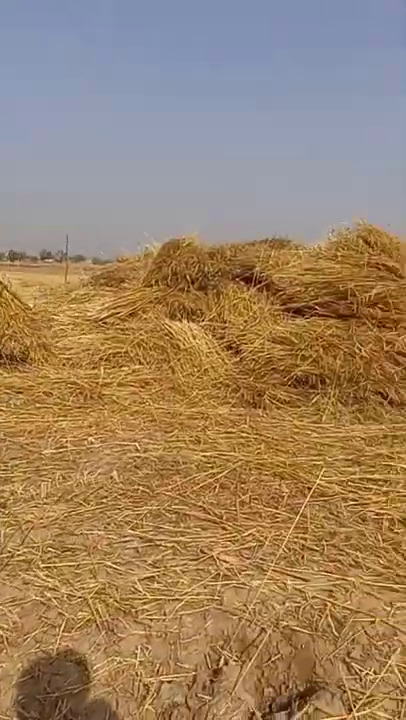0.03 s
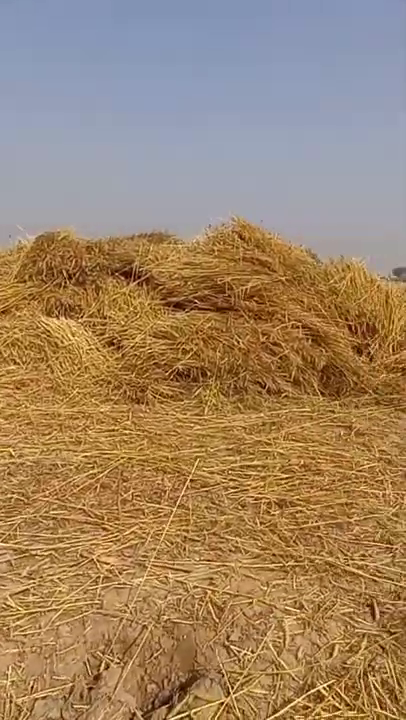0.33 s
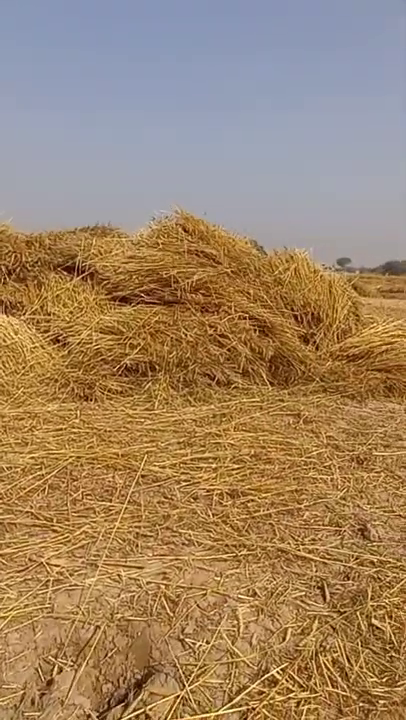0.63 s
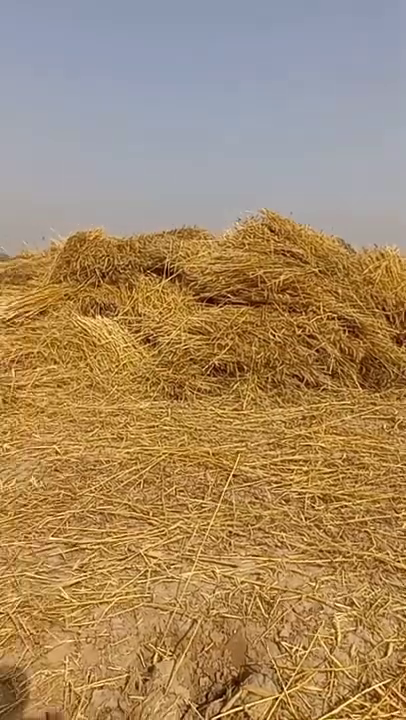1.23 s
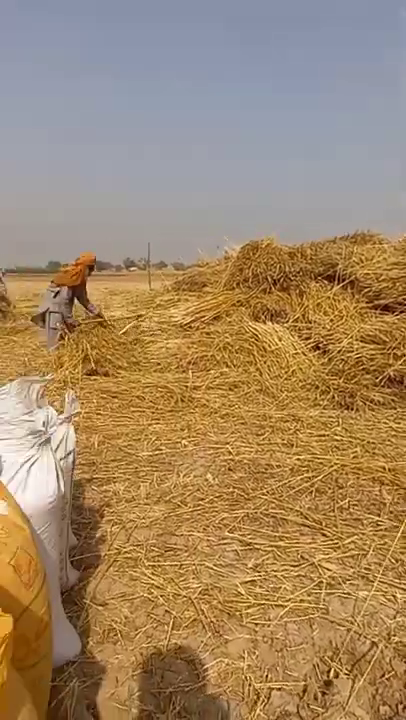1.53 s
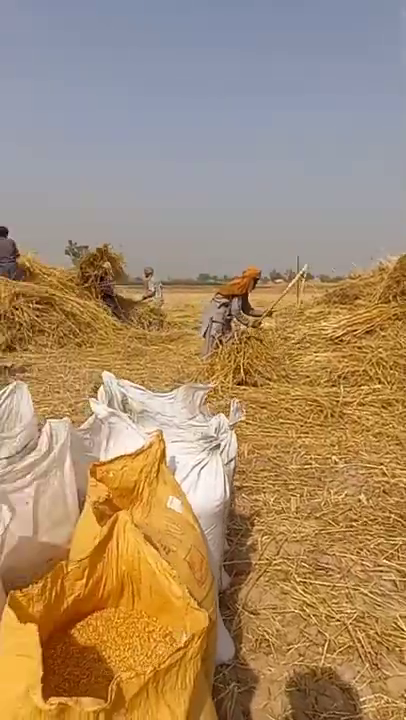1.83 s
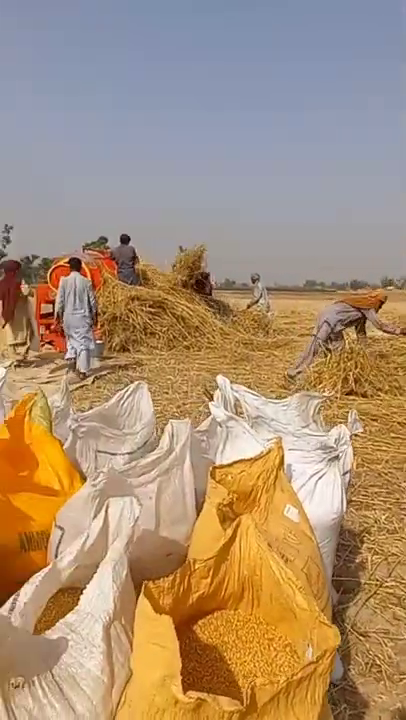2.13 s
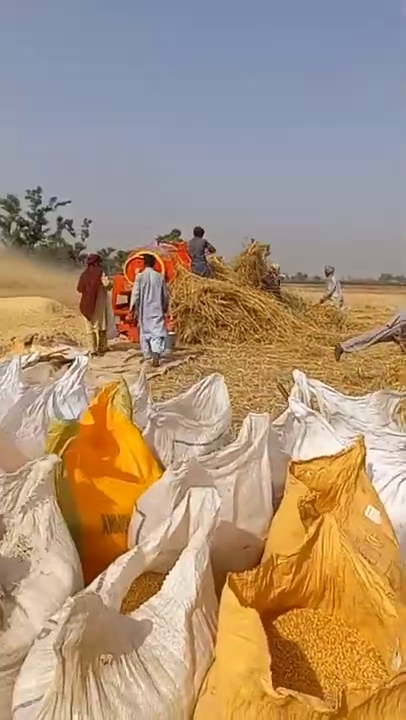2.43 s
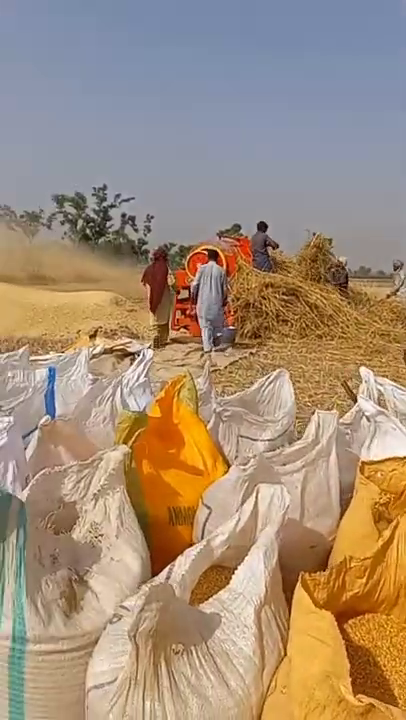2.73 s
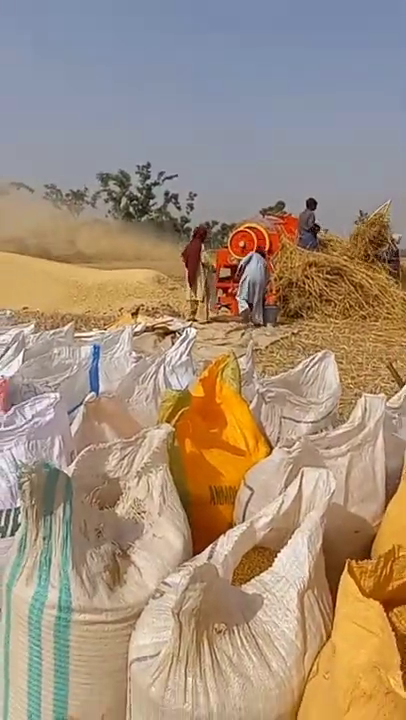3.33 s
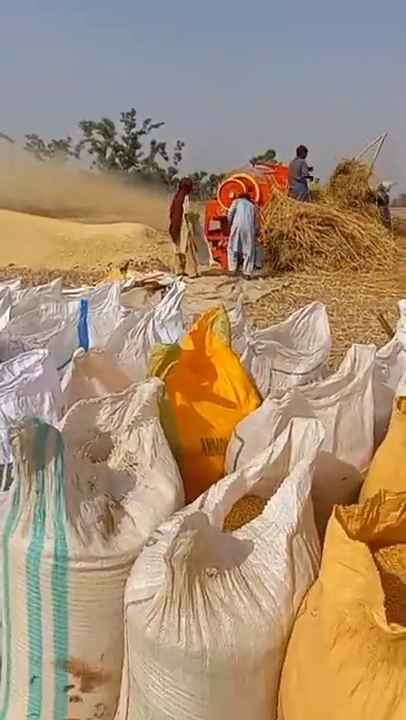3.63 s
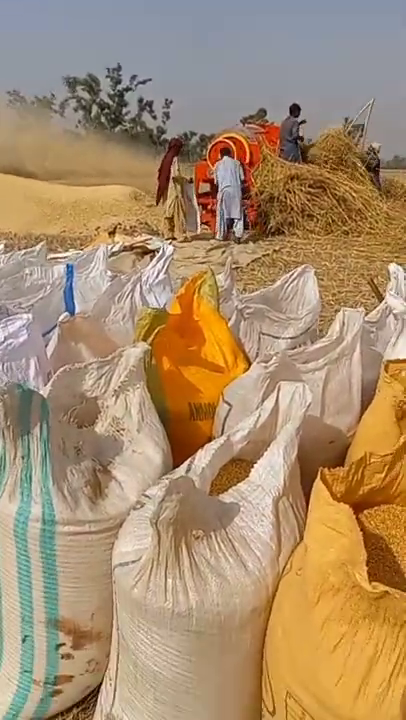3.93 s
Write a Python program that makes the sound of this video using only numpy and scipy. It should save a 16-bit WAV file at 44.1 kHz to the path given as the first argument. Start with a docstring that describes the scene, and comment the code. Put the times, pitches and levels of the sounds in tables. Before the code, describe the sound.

A threshing machine and its diesel engine drone steadily, with belt chirps and hissing straw.

```python
"""In an open field, a four-cylinder diesel drives a threshing machine, slowing a little as sheaves go in.
Pulses of exhaust make a drone, the spinning drum hums and roars, the drive belt slips with a chirp
on every lap, and dry straw hisses and snaps.
The listener starts with the machine off to the left and turns to face it halfway through."""
import sys
import numpy as np
from scipy import signal
from scipy.fft import rfft, irfft
from scipy.io import wavfile
from scipy.ndimage import uniform_filter1d, map_coordinates

SR = 44100
rng = np.random.default_rng(int(sys.argv[2]) if len(sys.argv) > 2 else 0)


def wav_record(signal):
    """Record a signal, one row per channel, as 16-bit PCM in the file named by sys.argv[1]."""
    frames = np.transpose(np.atleast_2d(signal))
    bounded = np.clip(frames, -1, 1)
    # unit amplitude maps onto the largest positive 16-bit level
    quanta = np.round(bounded * 32767).astype(np.int16)
    wavfile.write(sys.argv[1], SR, quanta)


N = 176400

# The listener's turn: time_s, facing (0 side-on, 1 facing the machine)
LISTENER_TURN = [(0, 0.45), (.3, 0.26), (.9, 0.013), (1.5, 0.34), (1.85, 0.72), (2.3, 0.82)]
# How alike rushing air is at the two ears: frequency_hz, likeness (0 to 1)
EAR_LIKENESS = [(300, 0.78), (1400, 0.85), (2400, 0.42), (4000, 0.2), (6000, 0.16), (9000, 0.9)]

# Loudness of the straw's hiss: time_s, level_db
STRAW_LEVEL = [(0, -44.5), (.45, -45.5), (.6, -48.5), (1.45, -49), (1.9, -45), (2.53, -43.5), (2.58, -38.5),
               (2.75, -43.5), (3.1, -41.5), (3.38, -38.5), (3.75, -42.5)]
# Tone of the straw: frequency_hz, relative_db
STRAW_COLOUR = [(2000, -21), (3500, 6.5), (5500, 6), (6600, 4.5), (7400, -10), (9000, -2), (12500, 2),
                (15500, -2)]
# Snapping stalks: start_s, level_db
STALK_SNAPS = [(1.75, -40), (1.864, -34)]

# Roar of drum and fan at each ear: facing_hz, facing_db_per_hz, side_on_hz, side_on_db_per_hz
ROAR_LEFT = [(571, -82.5, 1050, -76), (686, -65, 780, -71), (880, -65.5, 960, -66.5),
             (1230, -70, 1240, -70), (1680, -82, 1850, -78), (2023.5, -66, 2200, -71.5),
             (2300, -76.5, 3100, -86.5), (4000, -74.5, 3700, -73), (5100, -70, 5400, -69),
             (6140, -81, 7040, -82.5), (7100, -100, 7100, -94.5)]
ROAR_RIGHT = [(586, -78, 1040, -67), (695, -67, 770, -72.5), (880, -64.5, 830, -70), (1214, -71, 2130, -71),
              (1670, -81, 1100, -63), (1970, -73, 2310, -67), (2310, -76, 3650, -80),
              (4400, -72, 5600, -78), (4860, -65.5, 6260, -74), (6300, -80.5, 7000, -77.5),
              (7200, -100, 6530, -102)]
# The thresher's ringing panels: pitch_hz, level_db
PANEL_TONES = [(720, -50.5), (820, -48.5), (895, -47), (1223, -50), (3900, -50.5)]

# Belt chirps, one a lap: peak_s, relative_db
BELT_CHIRPS = [(.025, -30), (.19, -33), (.345, -32), (.51, -36), (.679, -36), (.845, -39.5), (1.006, -33),
               (1.175, -34.5), (1.335, -35.5), (1.495, -31.5), (1.664, -30), (1.83, -31), (1.992, -25.5),
               (2.154, -25.5), (2.325, -36.5), (2.49, -34), (2.655, -32), (2.825, -26.5), (2.99, -26.5),
               (3.16, -27), (3.335, -30), (3.505, -31.5), (3.675, -31.5), (3.845, -28)]
# Tones in a chirp: pitch_ratio, first_pulley_db, second_pulley_db
SQUEAL_TONES = [(1, 0, -5.5), (1.07, -7.5, -6), (1.2, -9, -8), (1.32, -14, -5)]

# Engine speed: time_s, firings_per_s
ENGINE_SPEED = [(0.2, 48.9), (.8, 48.55), (2.2, 48.1), (3.15, 46.9), (3.9, 47.4)]
# Tone of the exhaust gas, side-on and facing: frequency_hz, relative_db
GAS_SIDE_COLOUR = [(32, -35), (55, 0), (82, 6), (115, -7), (160, -6), (230, 0.5), (340, 1), (450, -1.5),
                   (560, -8), (750, -23), (1400, -36)]
GAS_FACING_COLOUR = [(32, -32), (55, 8.5), (82, 6), (115, -3), (160, 0), (230, -4), (340, 1), (450, -12),
                     (560, -34), (750, -35), (1400, -46)]
# Tones of the exhaust: multiple_of_firing_rate, light_load_db, heavy_load_db
EXHAUST_TONES = [(1, -29, -32), (2, -21, -20), (3, -39, -35), (4, -30, -31), (5, -33.5, -33.5),
                 (6, -30, -29), (7, -30.5, -42.5), (8, -60, -46.5), (9, -42.5, -42.5), (10, -47.5, -49.5),
                 (11, -57.5, -73), (12, -58.5, -80)]
# Extra level for the exhaust's middle tones: time_s, boost_db
MIDDLE_BOOST = [(0, -3.5), (1.2, -0.1), (2.55, 2), (3.2, -0.5)]
# Throb of the unequal cylinders: multiple_of_firing_rate, level_db
THROB_TONES = [(1.25, -38), (1.5, -38), (1.75, -39.5), (2.25, -42), (2.5, -41)]


def undb(db):
    """Turn decibels into a gain."""
    return 10 ** (np.asarray(db) / 20)


def times():
    """The time of every sample, in seconds."""
    return np.arange(N) / SR


def curve(rows):
    """Join (time_s, value) rows with straight lines."""
    return np.interp(times(), *np.array(rows).T)


def ramp(start_s, length_s):
    """A smooth step from 0 to 1."""
    return .5 - .5 * np.cos(np.pi * np.clip((times() - start_s) / length_s, 0, 1))


def wobble(rate_hz):
    """A smooth random wobble, about 1 in size."""
    span = max(int(SR / rate_hz), 1)
    smooth = uniform_filter1d(rng.standard_normal(N), span, mode="wrap")
    smooth = uniform_filter1d(smooth, span, mode="wrap")
    return (smooth - smooth.mean()) / smooth.std()


def over_hz(points):
    """Spread (frequency_hz, value) points over all frequencies."""
    hz, value = np.array(points).T
    return np.interp(np.log(np.arange(N // 2 + 1) * SR / N + 1), np.log(hz), value)


def colour(sound, points):
    """Shape a sound's bass and treble, then set its level to 1."""
    shaped = irfft(rfft(sound) * undb(over_hz(points)), N)
    return shaped / shaped.std()


def turning_colour(noise, rows, facing):
    """Shape noise so that its tone glides as the listener turns."""
    hz, frame_s, frames = signal.stft(noise, SR, nperseg=512)
    front, side = np.hsplit(np.array(rows), 2)
    turns = np.interp(frame_s, times(), facing)
    db = np.array([np.interp(hz, *(side + (front - side) * turn).T) for turn in turns])
    return signal.istft(frames * undb(db.T), SR)[1][:N] * np.sqrt(SR / 2)


def air_noise():
    """White noise for two ears, more alike at some frequencies than at others."""
    alike = np.clip(over_hz(EAR_LIKENESS), 0, 1)
    mid, side = rfft(rng.standard_normal((2, N)))
    mid, side = mid * np.sqrt(1 + alike), side * np.sqrt(1 - alike)
    return irfft(np.array([mid + side, mid - side]), N) / np.sqrt(2)


def pan(db):
    """Gains for the two ears; positive db leans left."""
    return undb(np.array([[db], [-db]]) / 2)


def at_ears(sound, lag_s, return_s, swing_s=0.727):
    """A source swings to the left, where it reaches the right ear late, then back to the front."""
    delay_s = lag_s * (ramp(-0.44, swing_s) - ramp(return_s, swing_s))
    right = map_coordinates(sound[1], [(times() - delay_s) * SR], mode="mirror")
    return np.array([sound[0], right])


def straw(snap_decay_s=0.0064):
    """Dry straw gives a grainy hiss and a few stalks snap, a little to the right."""
    t = times()
    hiss = undb(curve(STRAW_LEVEL) + wobble(1500))
    snaps = sum(undb(db) * (t >= at) * np.exp(-abs(t - at) / snap_decay_s) for at, db in STALK_SNAPS)
    return pan(-5) * (hiss + snaps) * colour(rng.standard_normal((2, N)), STRAW_COLOUR)


def panel_ring(pitch_hz, width_share=0.029):
    """A shaken panel rings: a narrow band of noise around one pitch."""
    angle = 2 * np.pi * pitch_hz * times()
    width_hz = pitch_hz * width_share
    return wobble(width_hz) * np.cos(angle) + wobble(width_hz) * np.sin(angle)


def thresher(firings, facing, hum_db=-35.5, hum_cycles_per_firing=2.585, flutter_db=0.92):
    """The drum hums; drum and fan roar, flutter and ring the panels as straw is beaten."""
    hum = np.sqrt(2) * undb(hum_db + wobble(2.1)) * np.sin(2 * np.pi * hum_cycles_per_firing * firings)
    panels = sum(undb(db) * panel_ring(hz) for hz, db in PANEL_TONES)
    left, right = air_noise()
    roar = np.array([turning_colour(left, ROAR_LEFT, facing), turning_colour(right, ROAR_RIGHT, facing)])
    return hum + (roar + facing * panels) * undb(flutter_db * wobble(64))


def chirp(peak_s, db, facing, tones, scrape, width_s, base_hz=4720, side_db_per_octave=18.5):
    """One slip of the belt: a scrape and a few rough, gliding squeals swell and fade."""
    near = np.flatnonzero(abs(times() - peak_s) < .06)
    t = near / SR - peak_s
    slip = scrape[:, near]
    glide_per_s = 2 * (1 + rng.standard_normal())  # usually upward
    for ratio, tone_db in tones:
        rough = uniform_filter1d(rng.standard_normal(len(t)), size=40)
        off_pitch = 0.0121 * rng.standard_normal()
        pitch_hz = base_hz * ratio * (1 + off_pitch + glide_per_s * t + 0.017 * rough / rough.std())
        # High squeals carry better side-on.
        side_db = side_db_per_octave * np.log2(ratio) * (1 - facing[near])
        gain = undb(tone_db + 2 * rng.standard_normal() + side_db)
        ear_phase = rng.standard_normal((2, 1))
        slip = slip + gain * np.sin(2 * np.pi * np.cumsum(pitch_hz) / SR + ear_phase)
    sound = np.zeros((2, N))
    sound[:, near] = undb(db) * np.exp(-.5 * (t / width_s) ** 2) * slip
    return sound


def belt(facing, scrape_hz=(4550, 6050), scrape_db=-8.5, pulley_gap_s=.057):
    """On each lap the belt chirps at one pulley, then more briefly at the other."""
    ratios, first, second = np.array(SQUEAL_TONES).T
    band = signal.butter(4, scrape_hz, "band", fs=SR, output="sos")
    scrape = signal.sosfilt(band, rng.standard_normal((2, N)))
    scrape = undb(scrape_db) * scrape / scrape.std()
    laps = np.zeros((2, N))
    for peak_s, db in BELT_CHIRPS:
        laps += chirp(peak_s, db - .5, facing, zip(ratios, first), scrape, width_s=0.012)
        second_db = (db - 38.5) / 2  # halfway to a quiet -38.5 dB
        laps += chirp(peak_s + pulley_gap_s, second_db, facing, zip(ratios, second), scrape, width_s=0.006)
    return laps * (pan(4) * (1 - facing) + pan(-2) * facing)


def exhaust_gas(firings, facing, repeat_share=0.54, swell_depth=0.56):
    """Gas rushes out, swelling once a firing and partly repeating every four firings."""
    cycle = np.interp(firings / 4, np.arange(400) / 400, rng.standard_normal(400), period=1)

    def rush(points):
        """Mix repeating and fresh noise of the same tone."""
        repeating = np.sqrt(repeat_share) * colour(cycle, points)
        return repeating + np.sqrt(1 - repeat_share) * colour(air_noise(), points)

    side = (1 - facing) * undb(-30.5) * rush(GAS_SIDE_COLOUR)
    front = facing * undb(-29.5) * rush(GAS_FACING_COLOUR)
    return (side + front) * (1 - swell_depth * np.sin(2 * np.pi * firings))


def engine(firings, rebound_share=0.71, rebound_firings=.43, waver_db=0.87, scatter_db=0.47):
    """Exhaust pulses drone over the throb of four unequal cylinders."""
    load = ramp(start_s=2.28, length_s=1)  # the tone changes as the drum takes up load
    angle = 2 * np.pi * (firings + 0.0025 * wobble(93))  # slightly uneven timing
    pulses = throb = 0
    for multiple, light_db, heavy_db in EXHAUST_TONES:
        # Each pulse rebounds in the pipe, which shifts the phase of its tones.
        shift = np.angle(1 + rebound_share * np.exp(-2j * np.pi * multiple * rebound_firings))
        boost_db = curve(MIDDLE_BOOST) if multiple in (4, 5, 6) else 0
        db = light_db + (heavy_db - light_db) * load + boost_db + waver_db * wobble(3.7)
        pulses += undb(db) * np.cos(multiple * angle + shift)
    for multiple, db in THROB_TONES:
        throb += undb(db + 2 * wobble(1.1)) * np.cos(multiple * angle + 2 * np.pi * rng.random())
    return np.sqrt(2) * (pulses * undb(scatter_db * wobble(50)) + throb)


def scene(first_firing_s=0.009825):
    """As the listener turns, the thresher comes to the front first, then the engine beside it."""
    # A running count of firings keeps the engine and drum in step.
    firings = np.cumsum(curve(ENGINE_SPEED)) / SR - first_firing_s * ENGINE_SPEED[0][1]
    facing = curve(LISTENER_TURN)
    diesel = at_ears(engine(firings) + exhaust_gas(firings, facing), lag_s=0.00033, return_s=1.83)
    machine = at_ears(thresher(firings, facing) + belt(facing), lag_s=0.00041, return_s=1.503)
    return diesel + machine + straw()


def record(dry, top_hz=15600):
    """Cut away the very highest treble."""
    return signal.sosfilt(signal.ellip(10, .2, 80, top_hz, fs=SR, output="sos"), dry)


dry = scene()
out = record(dry)
wav_record(out)
```